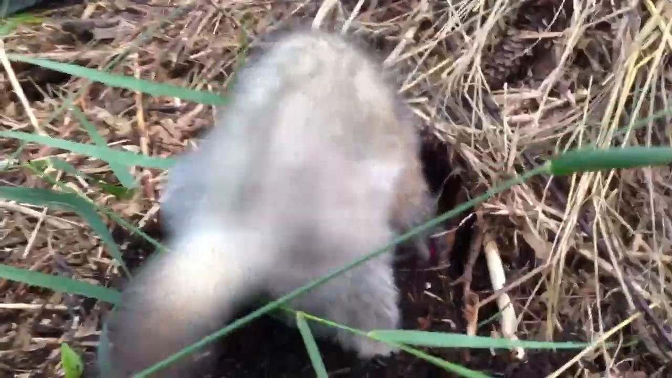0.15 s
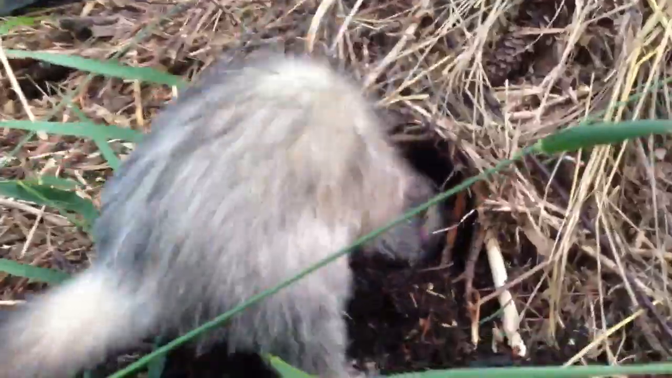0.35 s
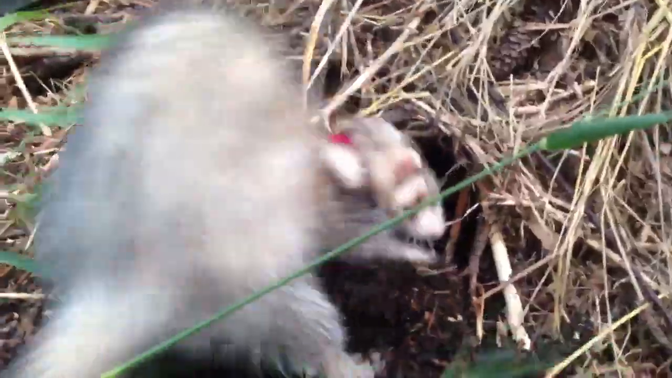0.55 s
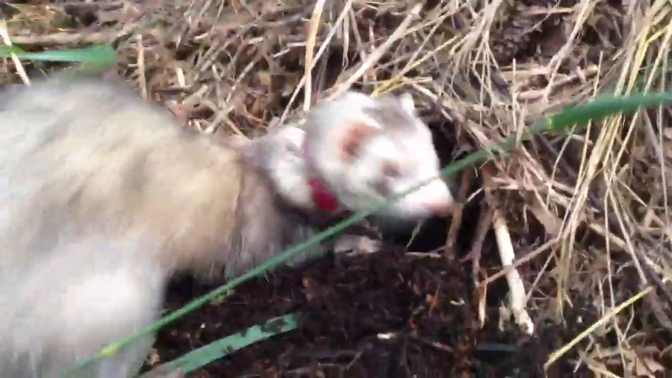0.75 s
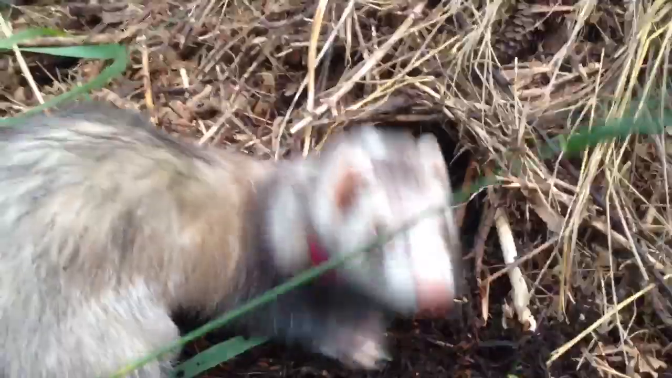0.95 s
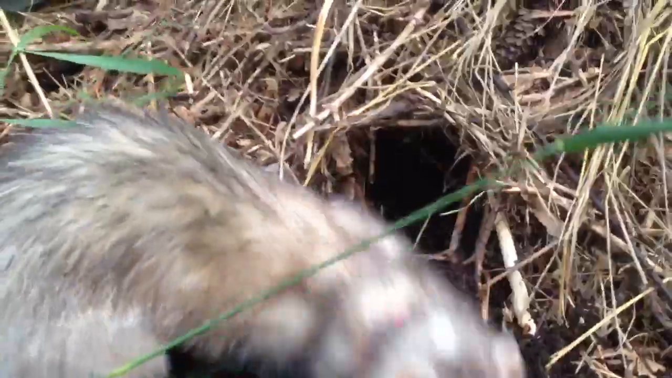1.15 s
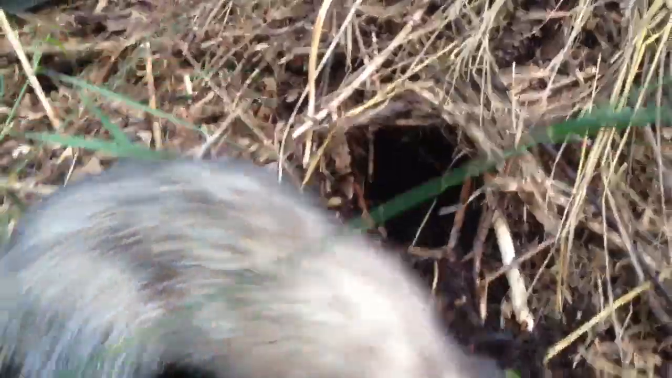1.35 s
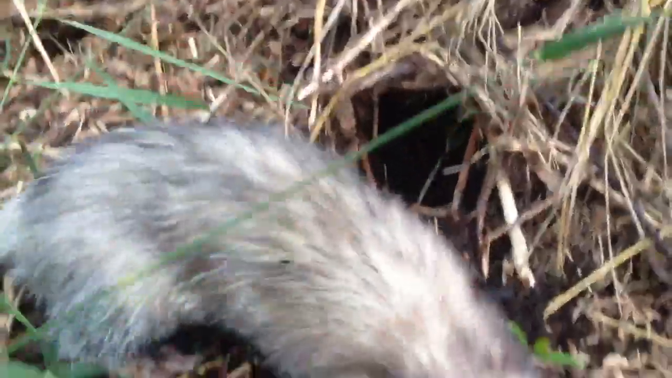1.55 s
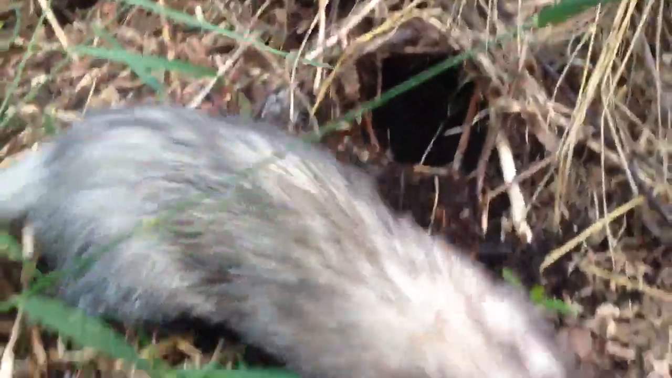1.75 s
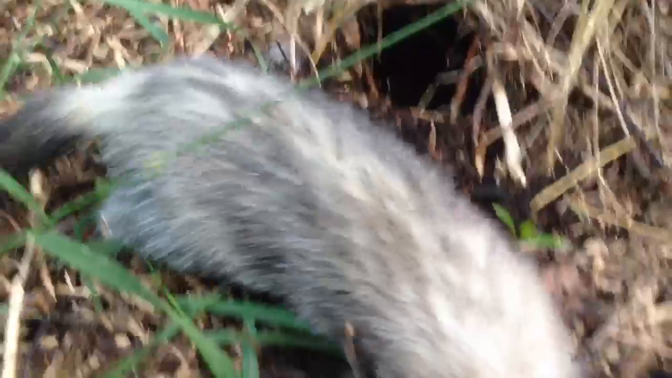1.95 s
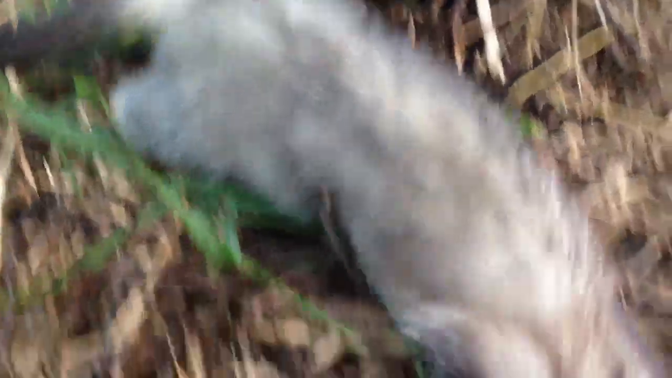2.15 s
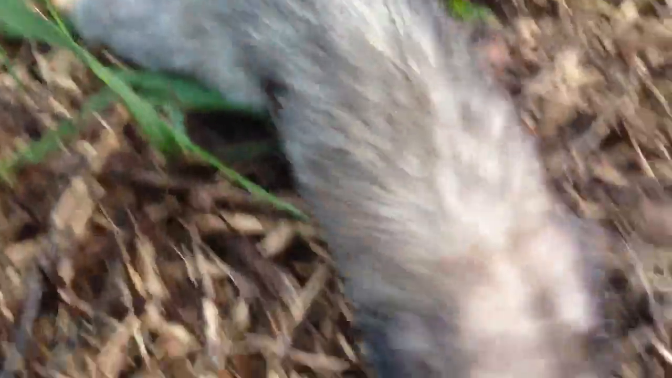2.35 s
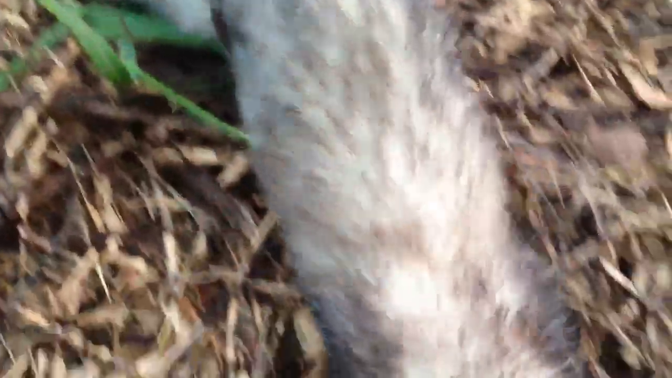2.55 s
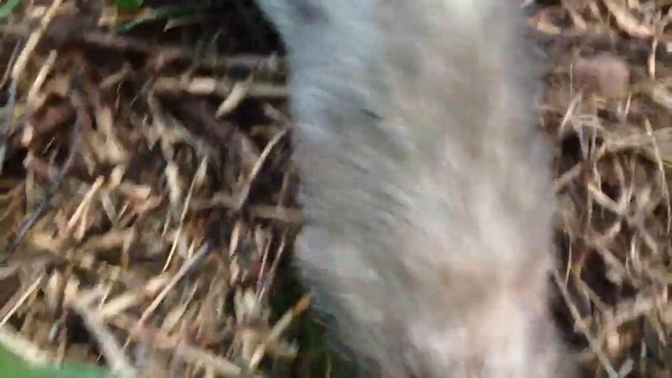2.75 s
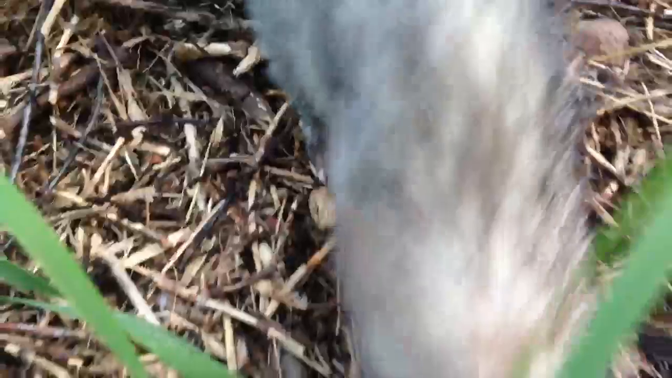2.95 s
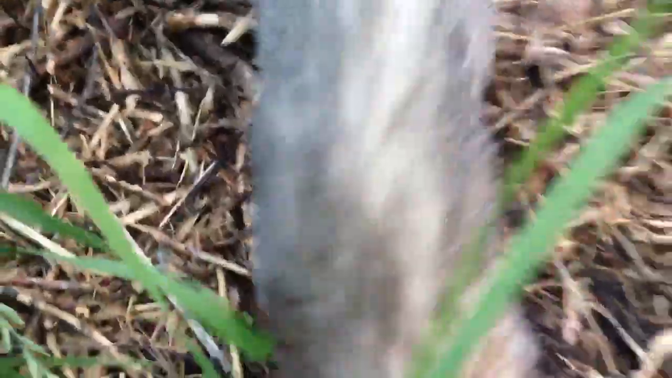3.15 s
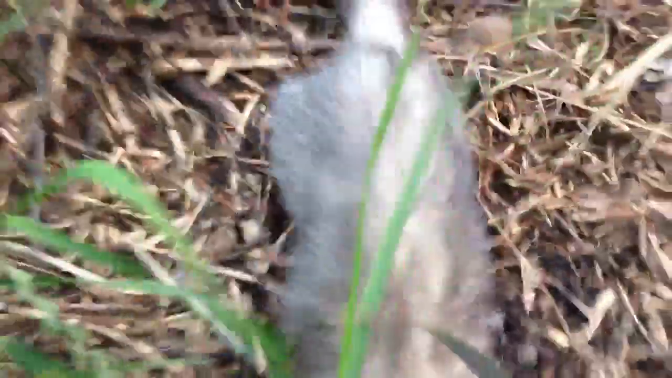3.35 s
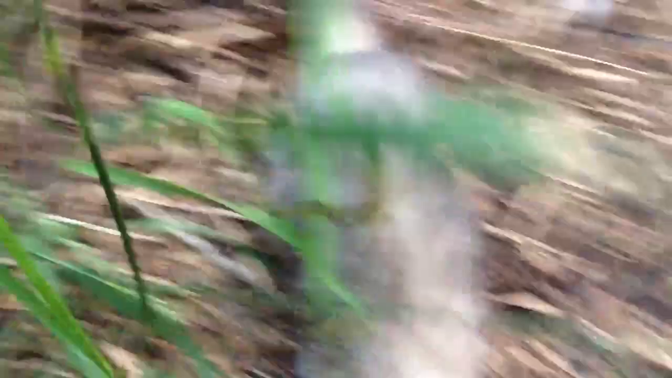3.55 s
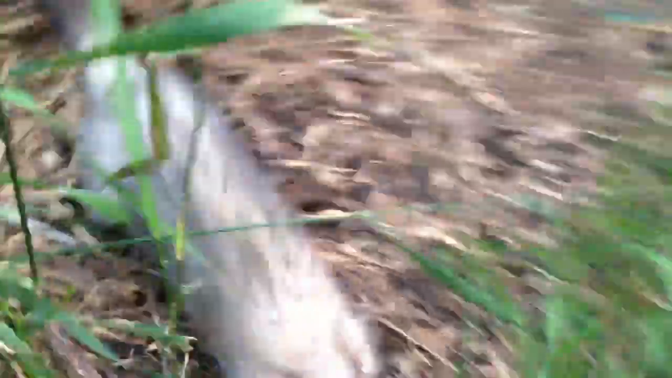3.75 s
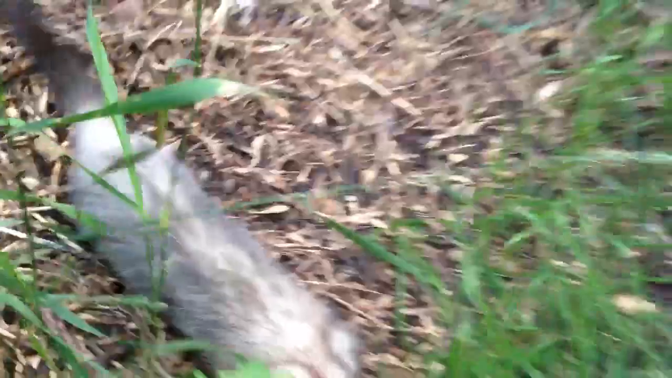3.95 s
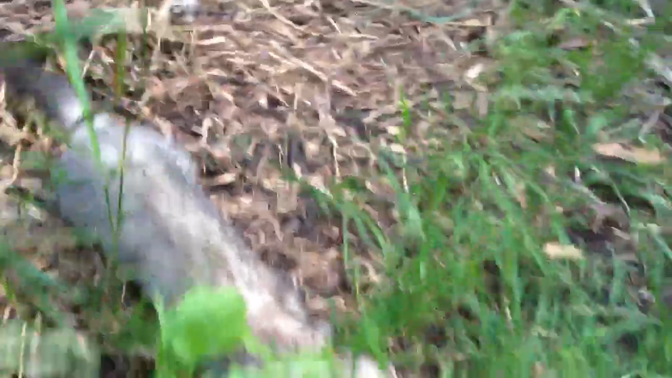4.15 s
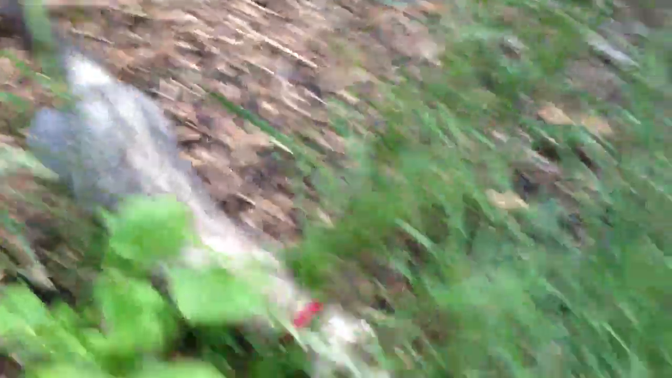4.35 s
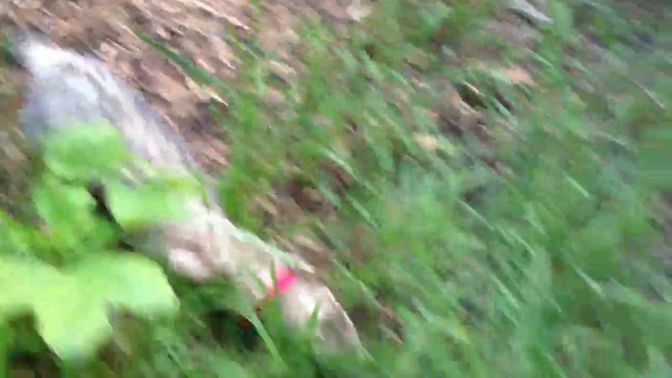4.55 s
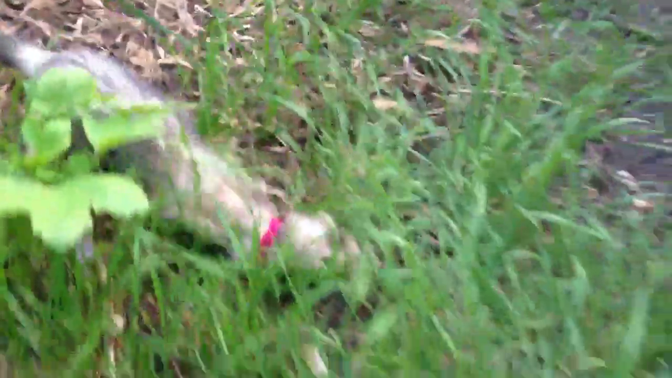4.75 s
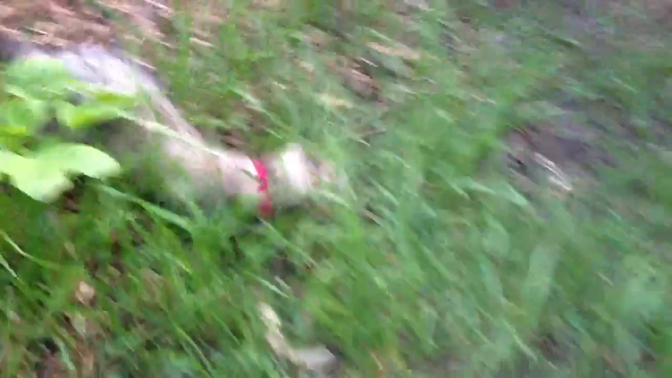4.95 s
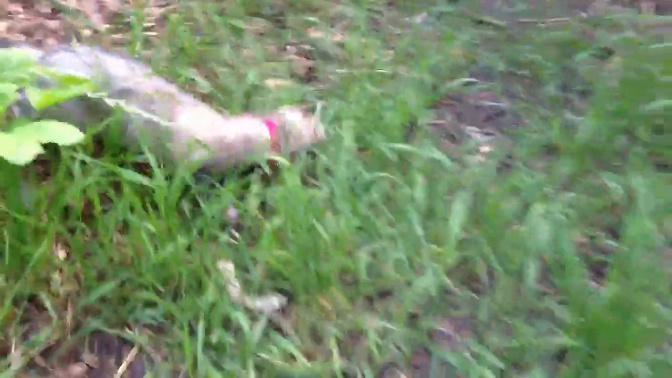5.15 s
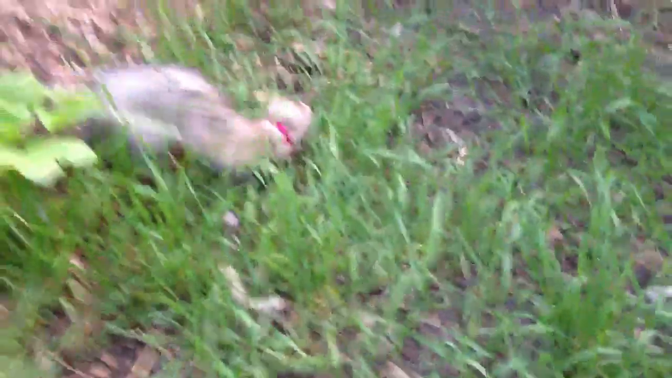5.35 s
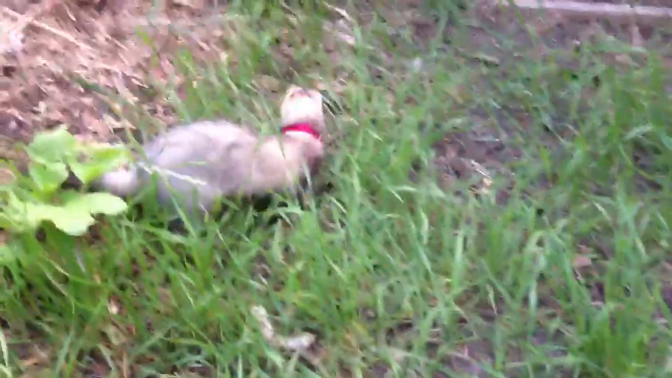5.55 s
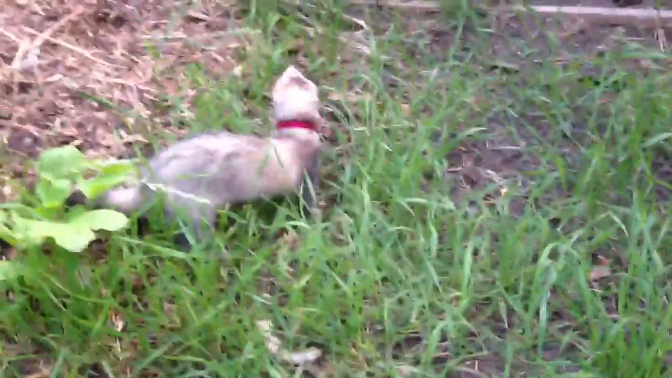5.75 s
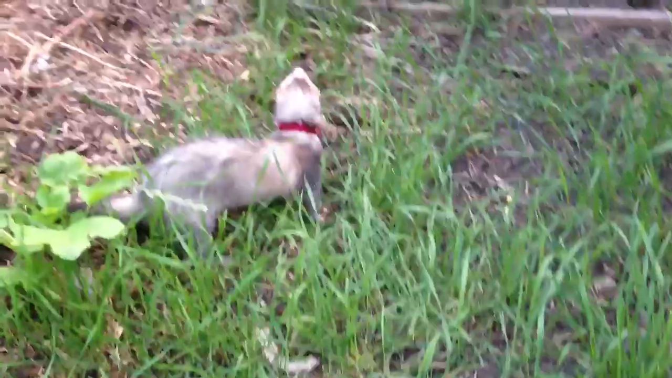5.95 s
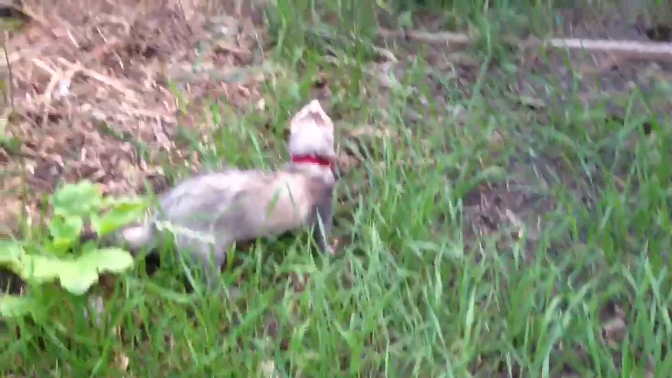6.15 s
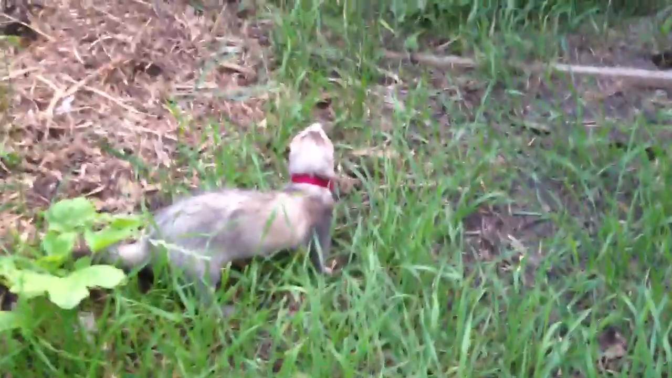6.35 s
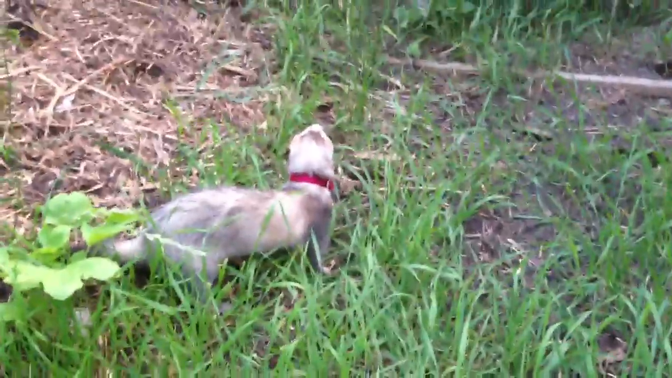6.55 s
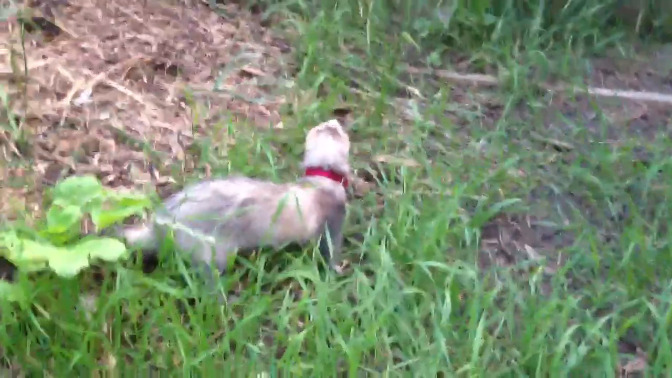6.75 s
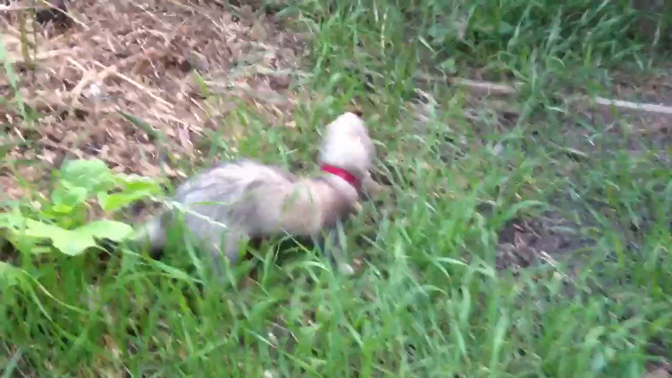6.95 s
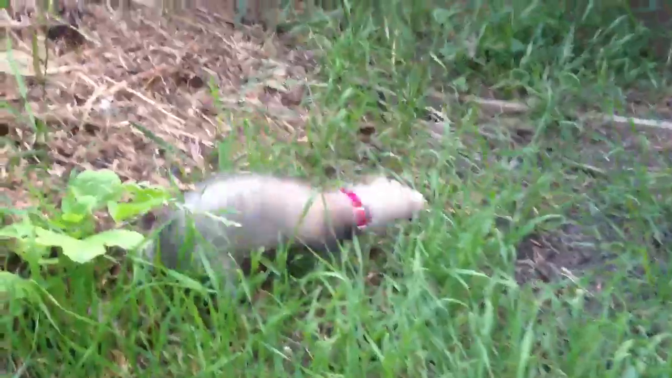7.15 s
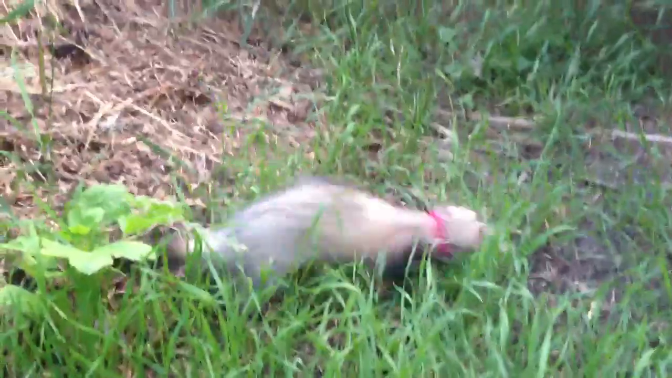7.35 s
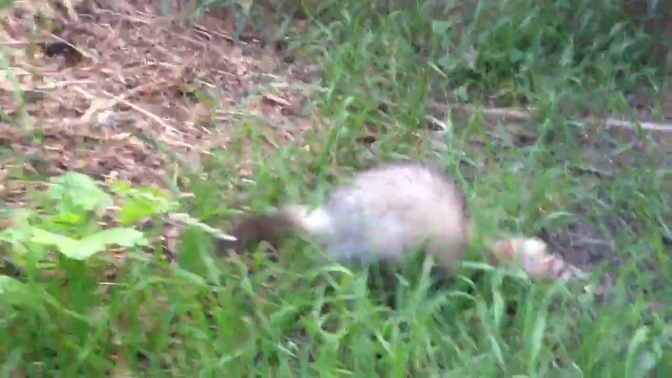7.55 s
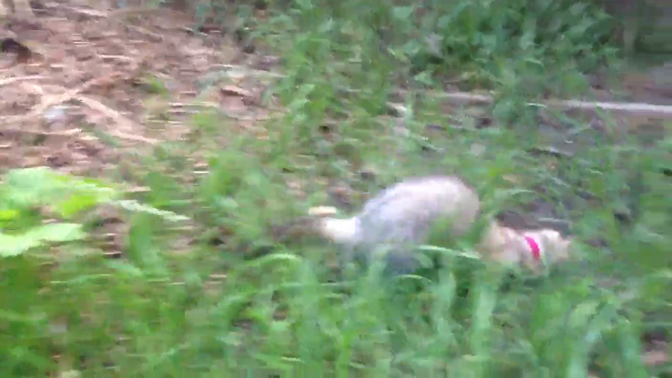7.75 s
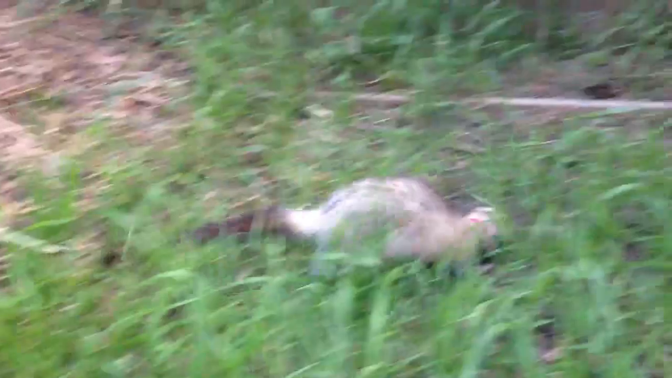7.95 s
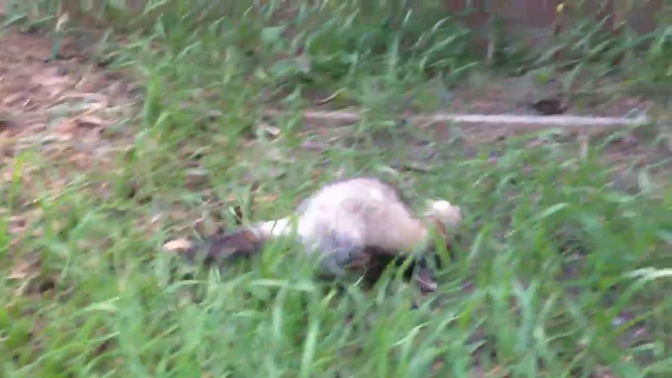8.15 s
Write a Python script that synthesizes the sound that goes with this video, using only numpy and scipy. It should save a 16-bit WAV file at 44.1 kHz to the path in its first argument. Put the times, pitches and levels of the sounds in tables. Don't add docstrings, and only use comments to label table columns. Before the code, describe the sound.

A handheld microphone close to the ground catches a collar bell's thin, sharp tinkling with crisp straw scratching, stalk ticks and leaf cracks. Jingles come in uneven groups, thickest early on, sparser while walking, nearly silent during a pause, then loudest and fastest near the end. Behind it are open-air hiss, soft tyre noise, a steady low engine hum with another vehicle pulling off, and a faint hoarse bird.

```python
import sys
import numpy as np
from scipy import signal
from scipy.fft import rfft, irfft, next_fast_len
from scipy.io import wavfile
from scipy.ndimage import uniform_filter1d, map_coordinates

SR = 44100
rng = np.random.default_rng(int(sys.argv[2]) if len(sys.argv) > 2 else 0)


def invert_db(level):
    return 10 ** (np.asarray(level, dtype=float) / 20)


def inscribe(sig):
    pcm = np.round(np.clip(np.atleast_2d(sig).T, -1, 1) * 32767)
    wavfile.write(sys.argv[1], SR, pcm.astype(np.int16))


N = 361002
TIME = np.arange(N) / SR
SHELL_HZ, OVERTONE_HZ = 5778, (13390, 13550)


def unit(x):
    return x / np.sqrt(np.mean(x ** 2) + 1e-20)


def curves(rows):
    s, *columns = np.transpose(rows)
    return [np.interp(TIME, s, column) for column in columns]


def wobble(rate):
    knots = rng.standard_normal(int(N * rate / SR) + 4)
    return map_coordinates(knots, [TIME * rate])


def bumps(t, count):
    return np.interp(t, np.linspace(0, t[-1], num=count), rng.standard_normal(count))


def filtered(x, response):
    m = next_fast_len(N + 8192)
    return irfft(rfft(x, m) * response(np.fft.rfftfreq(m, 1 / SR)), m)[:N]


def coloured(x, spectrum):
    f, db = np.transpose(spectrum)

    def response(hz):
        return invert_db(np.interp(np.log(hz + 1), np.log(f), db, -120, -120))

    return unit(filtered(x, response))


def crackle(per_second, spread_db, share):
    size_db = spread_db * np.clip(rng.standard_normal(N), -2, 2)
    happens = rng.random(N) < per_second / SR
    clicks = happens * invert_db(size_db) * np.sign(rng.standard_normal(N))
    share = np.clip(share, 0, 1)
    mix = np.sqrt(share) * unit(clicks) + np.sqrt(1 - share) * rng.standard_normal(N)
    z = signal.stft(mix, nperseg=256)[2]
    patches = uniform_filter1d(rng.standard_normal(z.shape), size=6, axis=0)
    patches = uniform_filter1d(patches, size=8, axis=1)
    return signal.istft(z * invert_db(1.6 * unit(patches)), nperseg=256)[1][:N]


def spit(count):
    return np.convolve(rng.standard_normal(count), [1, 1, -1, -1], "same")


def background():
    # t/s, level/dB
    rumble_db = [(0.0, -55.5), (1.23, -54), (8.14, -63), (8.19, -64)]
    # t/s, level/dB
    whoosh_db = [(0, -75.5), (2.8, -66.5), (3.8, -59.5), (4.1, -62), (4.4, -58), (5.1, -56), (5.3, -60.5),
                 (6.5, -63), (6.9, -67.5), (8.19, -69.5)]
    # f/Hz, level/dB per Hz
    rumble_colour = [(30, -37), (70, -24.5), (95, -17.5), (130, -2.5), (170, 2.5), (230, -4), (300, -21),
                     (500, -36.5)]
    tyre_colour = [(250, 3.5), (450, -0.5), (1100, -2.5), (2300, -11)]
    air_colour = [(150, -34), (260, 7.5), (500, -3), (900, -6.5), (2700, -14.5), (5700, -22.5),
                  (14600, -20.5), (15400, -29)]
    rumble_gain = invert_db(curves(rumble_db)[0] + 1.5 + 1.9 * wobble(10))
    rumble = rumble_gain * coloured(rng.standard_normal(N), rumble_colour)
    whoosh = invert_db(curves(whoosh_db)[0]) * coloured(crackle(300, 2.9, 0.07), tyre_colour)
    air = invert_db(-62.0 + 0.54 * wobble(3.3)) * coloured(rng.standard_normal(N), air_colour)
    return rumble + whoosh + air


def engine(hz, levels):
    turn = 2 * np.pi * np.cumsum(hz) / SR
    out = np.zeros(N)
    for order, db in enumerate(levels, 1):
        gain = np.sqrt(2) * invert_db(db + 0.97 * wobble(6.8))
        out += gain * np.sin(order * turn + 1.12 * wobble(6))
    return out


def vehicles():
    # t/s, firing f/Hz, bearing (0 side on, 1 from behind), gain for distance/dB
    engine_path = [(0, 110.5, 0.15, 1.8), (1.4, 109, 0.08, -0.8), (2.6, 107.4, 0.1, 1),
                   (4.3, 106.2, 0.6, 1.5), (5.5, 105.6, 0.84, 1.5), (7, 104.8, 1, -0.5),
                   (8.19, 102.7, 0.7, -6)]
    # level side on/dB, level from behind/dB
    order_levels = [(-57.5, -69.5), (-63, -64.5), (-72.5, -61), (-68.5, -82.5)]
    # t/s, firing f/Hz, level/dB
    pulling_path = [(2.3, 108.2, -81), (2.8, 110.9, -54.5), (3.7, 120.4, -60), (4.2, 118.3, -63.5),
                    (5.5, 120.8, -63.5), (6.4, 117.6, -77), (6.8, 118, -94)]
    hz, bearing, far_db = curves(engine_path)
    second_hz, second_db = curves(pulling_path)
    levels = [side + (behind - side) * bearing + far_db for side, behind in order_levels]
    fifth_db = -69.5 - 10 * ((TIME - 5.72) / 0.29) ** 4
    turning_away = engine(hz, levels + [fifth_db])
    return turning_away + engine(second_hz, [second_db - 8, second_db])


def stirring():
    # peak t/s, crisp straw level/dB, dull leaves level/dB, time to fade 10 dB/s (sign ignored)
    stir_rows = [(0.617, -53, -61, 0.01), (.2, -79, -96, 1), (.37, -77, -94, 5), (.78, -63, -71, 0.4),
                 (.875, -76, -89, 0.15), (1.38, -63.5, -73, 0.14), (1.68, -67.5, -69.5, 0.32),
                 (1.88, -55, -70, 0.04), (2.0, -59.5, -74, 0.18), (2.36, -70.5, -74, 0.84),
                 (2.664, -65, -83, -0.1), (2.7, -65, -84, 0.2), (2.78, -64.5, -63, 0.22),
                 (2.978, -57.5, -66, 0.06), (3.14, -76, -88, 0.2), (3.3, -71.5, -70.5, 1.5),
                 (3.555, -63, -59.5, 0.0652), (3.64, -62, -71, 0.31), (3.71, -72, -61.5, 0.15),
                 (3.81, -53, -52, 0.104), (4.2, -66, -57, 0.25), (4.4, -70, -54, 0.09),
                 (4.51, -60.5, -50.5, 0.09), (4.86, -66.5, -63, 0.33), (5.17, -62.5, -58.5, .06),
                 (5.22, -54.5, -54.5, 0.06), (5.47, -67, -63, 0.28), (5.582, -86, -86, 2),
                 (6.1, -93, -69, 1), (6.4, -87, -73.5, -2), (7.124, -56, -76, 0.022), (7.14, -62, -80, .03),
                 (7.18, -59, -80, .035), (7.246, -54, -74, 0.028), (7.29, -60, -80, .015),
                 (7.319, -60, -80, .02), (7.3, -66, -73.5, 0.5), (7.76, -67, -100, 1.1)]
    rise_share = 0.59
    t = TIME[::256]
    s, straw_db, leaves_db, fade = np.transpose(stir_rows)[..., None]
    away = np.where(t > s, t - s, (s - t) / rise_share)
    shape_db = -10 * away / np.abs(fade)
    gains = []
    for db, still_db in ((straw_db, -77.5), (leaves_db, -90.5)):
        power = np.sum(invert_db(db + shape_db) ** 2, axis=0) + invert_db(still_db) ** 2
        gains.append(np.interp(TIME, t, np.sqrt(power)))
    return gains


def crumbs():
    # t/s, f/Hz
    crumb_pitch = [(0, 4380), (3.5, 4800), (3.59, 2300), (3.7, 2800), (3.8, 3300), (3.86, 4200),
                   (4.18, 2000), (4.33, 2300), (4.4, 3700), (4.56, 3400), (4.9, 2800), (5.16, 4000),
                   (5.26, 3600), (5.36, 2500), (8.19, 2500)]
    per_second, cycles = 1300, 4.9
    count, k = int(per_second * N / SR), np.arange(200)
    at = rng.integers(0, N, count)
    hz = curves(crumb_pitch)[0][at, None] * np.exp(.16 * rng.standard_normal((count, 1)))
    turns = hz * k / SR
    size_db = 4 * rng.exponential(size=(count, 1)).clip(0, 2.5)
    rings = invert_db(size_db - 30 * turns / cycles) * np.sin(2 * np.pi * turns)
    total = np.bincount((at[:, None] + k).ravel(), rings.ravel(), N + 1)
    return unit(np.diff(total)[:N])


def litter():
    # f/Hz, level/dB per Hz
    straw_colour = [(2500, -11), (4300, -4), (7000, -3), (9000, -5.5), (13700, -7), (15300, -7)]
    leaf_colour = [(800, -17.5), (1700, -0.5), (3200, -3.5), (4500, -5.5), (7000, -11.5), (11000, -25.5)]
    straw_gain, leaves_gain = stirring()
    straw = straw_gain * invert_db(2.5 + 1.9 * wobble(70)) * coloured(crackle(3000, 4, .17), straw_colour)
    shuffle = coloured(crackle(1200, 5, .25), leaf_colour) + invert_db(1.5) * crumbs()
    return straw + leaves_gain * invert_db(1.2 * wobble(45)) * shuffle


def pellet():
    # (below 1 ms, even negative, the bell rings
    bell_strikes = [(.4565, -27.5, 2), (.4702, -25.5, -10), (.4893, -22, 1), (.4944, -37.5, 5),
                    (.5011, -25, 5.5), (.5205, -34, 6), (.5681, -30, 5.5), (.5942, -28.5, 1.5),
                    (.8241, -46, 3.5), (.8646, -47, 6), (.9748, -51.5, 13.5), (1.0041, -52, 17),
                    (1.03, -34.5, 3), (1.1368, -50.5, 9), (1.1582, -31, 5), (1.2154, -47, 3.5),
                    (1.3668, -40, 1.5), (1.3982, -34.5, 1), (1.4134, -30, 2), (1.6242, -46, 0.5),
                    (1.6694, -35.5, 5.5), (1.7317, -29.5, 6), (1.771, -51, 5),
                    (1.8336, -36.5, 12), (1.842, -31.5, 8), (1.8605, -17, 7), (1.879, -31.5, 3.5),
                     (1.8958, -43.5, 10), (1.9138, -34.5, 6), (1.9555, -42.5, 13.6), (1.981, -27.5, 3),
                     (2.003, -45, 6), (2.0105, -44, 9), (2.021, -37, 2.5), (2.0867, -36, 2),
                     (2.1274, -38, 6), (2.161, -39.5, 3.5), (2.1879, -47, 11.5), (2.212, -29, 3.5),
                     (2.223, -21.5, 3), (2.2314, -31, 2), (2.2917, -28.5, 2), (2.304, -44, 4),
                     (2.3124, -37.5, 8), (2.3695, -30, 2), (2.4933, -37, 3.5), (2.7198, -29.5, 5.5),
                     (2.7453, -29.5, 3.5), (2.7673, -34.5, 2), (2.8058, -30.5, 2.5), (2.813, -33.5, 4),
                     (2.8165, -24.5, 2.5), (2.823, -33, 5), (2.833, -35.5, 2), (2.873, -34, 1.5),
                     (2.911, -43, 13),
                    (2.9642, -31, 1.5), (2.9829, -41, 4.5), (3.0593, -42.5, 7), (3.0774, -28, 2.5),
                   (3.085, -32, 4.5), (3.3249, -38, 2), (3.368, -32.5, 3), (3.457, -48.5, 3),
                   (3.5504, -40, 2.5), (3.7668, -47, 8), (3.83, -34, 13), (3.88, -37, 2), (3.889, -30, 1),
                   (4.4406, -31.5, 7), (4.487, -37, 8.5), (4.5469, -16, 3.5), (4.5544, -27, 4.5),
                   (4.5702, -40.5, 10.5), (4.583, -34.5, 2), (4.6287, -33, 2), (4.648, -26.5, 1.5),
                   (4.678, -43.5, 5), (4.9119, -38, 4.5), (4.936, -40.5, 3), (4.972, -39, 2),
                   (5.012, -42, 4), (5.0687, -40, 4.5), (5.105, -32, 4), (5.292, -33, 36),
                   (5.374, -36.5, 4),
                    (.5348, -47.5, 24), (.68, -53, 8), (1.2628, -56.5, 11), (1.3132, -56.5, 8),
                (1.5502, -49, 2.5), (1.972, -40, 7), (2.1751, -41, 5), (2.2483, -46, 9),
                (2.4229, -47.5, 2.5), (2.94, -51, 21), (3.4085, -52, 5), (4.477, -47, 11.5),
                (4.72, -46, 2.5), (5.2741, -47, 36), (5.459, -53, 9), (5.4968, -53, 4.5),
                (5.9091, -45, 1.5), (5.9475, -52.5, 6.5), (6.086, -58, 8), (6.111, -57.5, 6.5),
                (7.0467, -48, 1.5), (7.2138, -39, 3.5), (7.2218, -40, 6), (7.2742, -40, 9), (7.353, -29, 7),
                (8.151, -48, 4),
                    (.0578, -55, 1), (.0862, -54.5, 1.5), (.1221, -57.5, 3), (.3551, -56, 1), (.4404, -56, 15),
               (2.713, -52, 3), (3.052, -49.5, 5), (3.066, -38, 3), (3.107, -46, 3.5), (3.542, -43, 0.5),
               (3.556, -40, 1), (3.563, -40, 1), (3.742, -49, 5), (3.848, -42, 6), (3.901, -46, 2),
               (3.908, -43, 2), (4.525, -45.5, 5.5), (4.537, -44, 6), (4.622, -46, 12), (5.253, -47.5, 13),
               (5.265, -49, 3), (5.306, -32.5, 10), (5.359, -56, 11), (5.402, -49, 3.5),
                    (7.087, -32, 22), (7.0933, -26.5, 9.5), (7.119, -27, 3), (7.123, -28, 8), (7.1305, -35, 7),
               (7.141, -25.5, 20), (7.149, -31, 4.5), (7.1613, -33, 5), (7.1778, -18.5, 7.5),
               (7.188, -29, 6), (7.1967, -33, 4), (7.2054, -26, 3.5), (7.229, -42, 12.5),
               (7.2431, -24.5, 4), (7.251, -18.5, 19), (7.263, -37, 13), (7.2848, -20, 12),
               (7.288, -16, 7.5), (7.3178, -14.5, 5.5), (7.323, -22, 11), (7.326, -26, 8),
               (7.3364, -26, 13), (7.342, -26, 5.5), (7.354, -24, 5), (7.377, -27.5, 8), (7.402, -31, 4.5),
               (7.411, -25, 2), (7.431, -37, 16), (7.4367, -34.5, 15), (7.458, -31, 5.5),
                    (7.4723, -41, 5), (7.5979, -56, 1.5), (7.658, -33, 5.5), (7.729, -28, 3), (7.741, -23, 4),
                  (7.7522, -25, 6), (7.756, -32, 5.5), (7.772, -37, 3.5), (7.8294, -24, 3),
                  (7.8372, -19, 3.5), (7.898, -28.5, 5), (7.912, -34.5, 5.5), (7.948, -55, 25),
                  (7.9691, -45.5, 7), (7.982, -47, 17.5), (7.994, -33, 6), (8.06, -35, 2.5), (8.08, -45, 9),
                  (8.096, -43, 9), (8.117, -43, 7.5), (8.1648, -41.5, 2.5)]
    hard = np.array(sorted(bell_strikes))
    s, db, ms = hard.T
    luck = rng.standard_normal((len(hard), 3))
    back_s = s + 2.9 * np.abs(ms) / 1000 + 0.0062 * np.exp(.55 * luck[:, 0])
    back_db = -49.5 + 0.52 * (db - db.mean()) + 2.1 * luck[:, 1]
    back_db = np.minimum(back_db, db - 14.0)
    back_ms = 3.8 * np.exp(0.61 * luck[:, 2])
    soft = np.transpose([back_s, back_db, back_ms])
    in_time = back_s < np.append(s[1:], N / SR)
    strong = db > -46
    return sorted(map(tuple, np.vstack([hard, soft[in_time & strong]])))


def tick(t, t60):
    hz, cycles = 5250, 6.5
    k = np.arange(-60, 61) / SR
    ringing = np.exp(-(k * hz / cycles * np.pi) ** 2) * np.cos(2 * np.pi * hz * k)
    noise = invert_db(-60 * t / t60) * rng.standard_normal(len(t))
    return np.convolve(noise, 2 * ringing / np.linalg.norm(ringing))[30:][:len(t)]


def bell():
    # f/Hz, level/dB, time to fade 60 dB/s
    lingering = [(6002, -28, .1), (6150, -28, .03), (5540, -14, .035), (5320, -16, .022)]
    free_ms = 3.5
    fade_shape = 1.15
    out, t = np.zeros(N + SR), np.arange(SR // 12) / SR
    strikes = pellet()
    chance = rng.standard_normal((len(strikes), 9))
    following = [row[0] for row in strikes[1:]] + [N / SR]
    for (s, db, ms), after, c in zip(strikes, following, chance):
        rise_s = .00078 * np.exp(.25 * c[3])
        rise = 1 - np.exp(-(t / rise_s) ** 2)
        stopped = invert_db(-60 * np.maximum(t - (after - s), 0) / 0.003)
        fade_db = -9 * (t / (max(ms, 1) / 1000)) ** fade_shape
        free = np.clip(ms / free_ms, .2, 1)
        rolling = 1 + .14 * bumps(t, count=40) + .15 * bumps(t, count=150)
        ring = rolling * invert_db(fade_db) * stopped * np.sin(2 * np.pi * (SHELL_HZ + 30 * c[0]) * t)
        for (hz, level_db, t60), g in zip(lingering, c[[1, 8, 2, 3]]):
            gain = invert_db(level_db + 3 * g - 60 * t / (t60 * free))
            ring += rolling * gain * np.sin(2 * np.pi * hz * t)
        for hz, g in zip(OVERTONE_HZ, c[4:]):
            gain = invert_db(-40 + 3 * g - 60 * t / .05)
            ring += rolling * gain * np.sin(2 * np.pi * (hz - 20 + 60 * c[7]) * t)
        contact = invert_db(-29) * tick(t, .012) + invert_db(-42 - 60 * t / .003) * spit(len(t))
        knock = invert_db(3 * c[6]) * contact
        out[round(s * SR):][:len(t)] += invert_db(db + 3.0) * (rise * ring + knock)
    return out[:N]


def stalks():
    # t/s, peak level/dB, f/Hz
    stalk_ticks = [(0.14, -47, 11700), (0.1819, -50, 11900), (0.4863, -35, 12500), (0.5959, -46, 7820),
                   (0.6683, -50.5, 9780), (0.6798, -41.5, 11500), (0.777, -45, 13000), (0.9017, -43, 8000),
                   (0.9654, -45.5, 11700), (1.1427, -43, 7510), (1.6235, -49, 9230), (1.7139, -48, 8620),
                   (1.904, -36, 8130), (1.9975, -39, 7860), (2.012, -41, 8500), (2.024, -48, 7500),
                   (2.061, -40, 7840), (2.2557, -47, 7790), (2.367, -41, 9020), (2.6622, -43, 12400),
                   (2.972, -37, 7800), (3.101, -42, 9100), (3.136, -46, 10600), (3.3158, -49, 9490),
                   (4.5659, -51, 7850), (4.6462, -43, 8890), (5.1581, -56, 7670), (5.5766, -53, 9830)]
    out, t = np.zeros(N + SR), np.arange(SR // 60) / SR
    for s, db, hz in stalk_ticks:
        hiss = .18 * np.diff(rng.standard_normal(len(t) + 1))
        ring = np.sin(2 * np.pi * hz * t) * invert_db(-60 * t * hz / 16)
        out[round(s * SR):][:len(t)] += invert_db(db + 5.0 - 60 * t / .007) * (hiss + ring)
    return out[:N]


def glints():
    # t/s, peak level/dB, four thirds of the time to fade 60 dB/s
    glint_rows = [(0.4578, -67, 0.085), (0.4897, -42.5, 0.085), (0.5005, -50, 0.093), (1.1572, -58, 0.085),
                  (1.3772, -63, 0.085), (1.669, -63, 0.085), (1.732, -61, 0.085), (1.8336, -53, 0.085),
                  (1.8604, -34, 0.091), (1.8784, -52, 0.085), (1.9128, -54, 0.085), (1.9549, -46, 0.085),
                  (1.9812, -56, 0.085), (2.2222, -42, 0.079), (2.3115, -64, 0.085), (2.4931, -53, 0.078),
                  (2.7211, -52, 0.085), (2.745, -57, 0.085), (2.8165, -45, 0.085), (2.9636, -57, 0.085),
                  (3.8306, -45, 0.085), (3.8462, -46, 0.076), (4.3275, -56, 0.085), (4.4392, -51.5, 0.085),
                  (4.547, -60, 0.085), (4.6477, -74, 0.085), (5.0698, -65, 0.085), (5.1042, -61, 0.085),
                  (5.274, -59, 0.085), (5.2916, -56, 0.085), (5.3054, -53, 0.085), (5.3586, -60, 0.085),
                  (5.3731, -56, 0.085), (7.0877, -55, 0.085), (7.1231, -52, 0.085), (7.1396, -44, 0.085),
                  (7.177, -41, 0.084), (7.2048, -48, 0.085), (7.223, -46, 0.085), (7.2513, -35, 0.064),
                  (7.2887, -41, 0.077), (7.3167, -33, 0.072), (7.3254, -48, 0.085), (7.3404, -46, 0.085),
                  (7.3769, -48, 0.085), (7.385, -54, 0.085), (7.4018, -51, 0.092), (7.431, -52, 0.085),
                  (7.463, -54, 0.078), (7.6579, -55, 0.085), (7.7287, -47, 0.085), (7.7392, -46, 0.085),
                  (7.838, -52, 0.085), (7.8987, -69, 0.085), (7.9946, -63.5, 0.085), (8.062, -62, 0.087),
                  (8.1637, -50.5, 0.072)]
    out, t = np.zeros(N + SR), np.arange(SR // 8) / SR
    for (s, db, t60), c in zip(glint_rows, rng.standard_normal((len(glint_rows), 3))):
        rolling = (1 + .25 * bumps(t, count=60)) * (1 - np.exp(-t / .001))
        pair = np.zeros(len(t))
        for hz, side in zip(OVERTONE_HZ, (1, -1)):
            pair += invert_db(4 * side * c[0].clip(-1, 1)) * np.sin(2 * np.pi * (hz + 25 * c[2]) * t)
        fade = invert_db(db + 2 - 60 * t / max(0.75 * t60, .01))
        out[round(s * SR):][:len(t)] += fade * rolling * pair / 2
    return out[:N]


def snaps():
    # t/s, peak level/dB, f/Hz
    straw_snaps = [(.8654, -43, 6500), (1.11, -47, 7500), (1.8347, -40, 4500), (1.8486, -43, 3600),
                   (1.9102, -39, 4040), (1.9937, -43, 4700), (2.061, -41, 3980), (2.3413, -44.5, 3690),
                   (2.978, -44, 7800), (2.988, -44, 7300), (3.545, -42, 4600), (3.562, -41, 4200),
                   (4.2494, -46, 800), (2.786, -41, 1350), (2.836, -44, 750), (2.977, -46, 750),
                   (1.916, -45, 2200), (2.062, -47, 750), (5.5757, -49, 2120)]
    # t/s, peak level/dB, f/Hz
    leaf_cracks = [(3.5386, -56, 1720), (3.5581, -29, 4400), (3.584, -42.5, 2300), (3.7786, -47, 3520),
                   (3.792, -42, 3200), (3.822, -38, 4700), (4.1023, -47, 2860), (4.1872, -52, 1990),
                   (4.5177, -28.5, 2900), (4.7958, -52.5, 2850), (5.158, -41, 3950), (5.2153, -46.5, 3460)]
    # t/s, peak level/dB
    twig_blows = [
        (2.763, -30),
        (2.786, -41),
    ]
    # f/Hz, width/Hz, level/dB
    wood_modes = [(690, 240, -8), (1210, 120, -1.5), (1610, 130, -4), (2150, 61, -16), (3320, 490, -15.5)]
    out, blows, t = np.zeros(N + SR), np.zeros(N), np.arange(SR // 40) / SR
    for s, db, hz in straw_snaps + leaf_cracks:
        click = .07 * invert_db(-60 * t / .004) * spit(len(t))
        ring = invert_db(-60 * t * hz / 9) * np.sin(2 * np.pi * hz * t)
        out[round(s * SR):][:len(t)] += invert_db(db) * (click + ring)
    for s, db in twig_blows:
        blow = 0.46 * rng.standard_normal(len(t)) + 8 * (t == 0)
        blows[round(s * SR):][:len(t)] += invert_db(db + 12.0 - 60 * t / 0.13) * blow

    def wood(f):
        total = 0
        for k, (centre, width, db) in enumerate(wood_modes):
            damping = 1j * f * width
            total = total + (-1) ** k * invert_db(db) * damping / (centre * centre - f * f + damping)
        return total

    return out[:N] + filtered(blows, wood)


def bird():
    # t/s, f/Hz, level/dB
    cry_rows = [
        [(1.45, 1120, -86), (1.6, 1180, -73), (1.75, 1225, -77), (1.9, 1255, -79), (2.1, 1225, -84)],
        [(5.98, 1090, -84), (6.1, 1085, -73), (6.2, 1040, -81), (6.38, 1070, -74), (6.6, 1090, -84)],
    ]
    out = np.zeros(N)
    for rows in cry_rows:
        hz, db = curves(rows)
        turn = 2 * np.pi * np.cumsum(hz * (1 + .014 * wobble(30))) / SR
        sounding = (TIME > rows[0][0]) & (TIME < rows[-1][0])
        note = (1.5 + 1.8 * wobble(110)) * np.sin(turn)
        octave = (1.2 + 3 * wobble(300)) * np.sin(2 * turn)
        out += sounding * invert_db(db) * (note + octave)
    return out


def scene():
    far = background() + vehicles() + bird()
    ground = litter() + stalks() + snaps()
    return (far + ground + bell() + glints())[None]


def top_cut(x):
    return signal.sosfilt(signal.butter(12, 16460, fs=SR, output="sos"), x)


def record(dry):
    def band_limit(hz):
        return invert_db(np.interp(hz, [15300, 15450, 16400], [0, -21, -25]))

    limited = filtered(dry[0], band_limit)
    return top_cut(limited[None])


dry = scene()
out = record(dry)
inscribe(out)
```